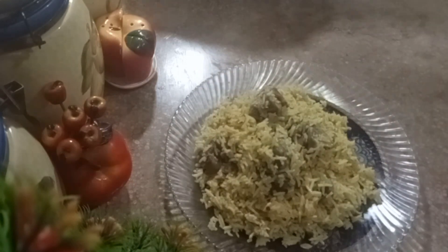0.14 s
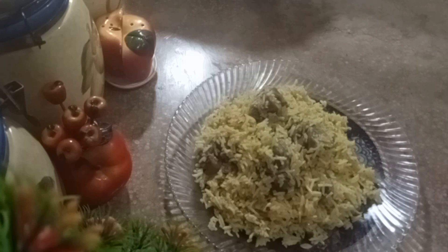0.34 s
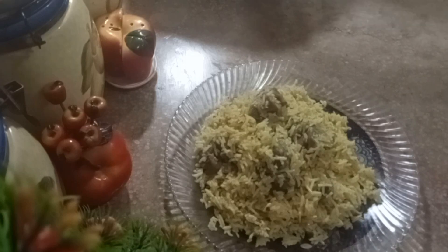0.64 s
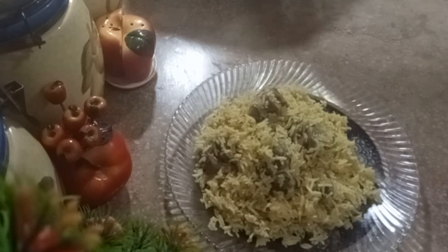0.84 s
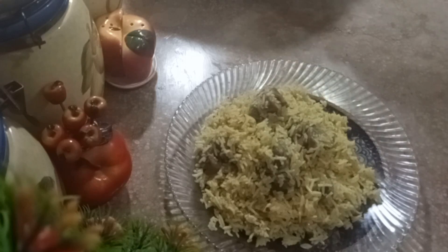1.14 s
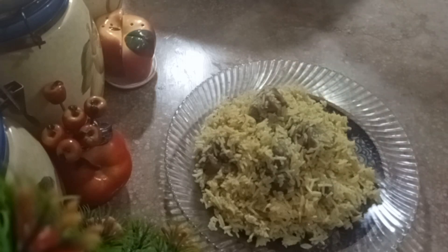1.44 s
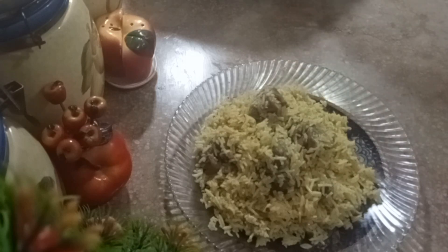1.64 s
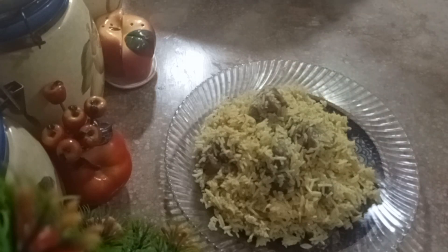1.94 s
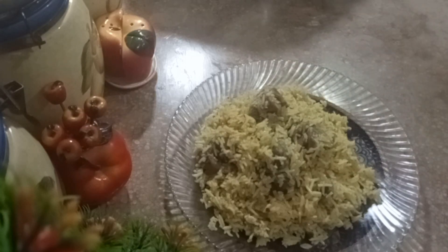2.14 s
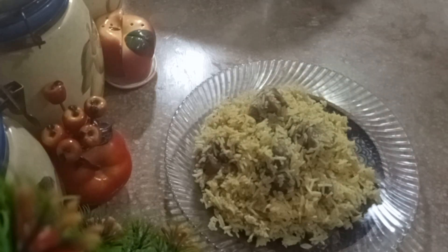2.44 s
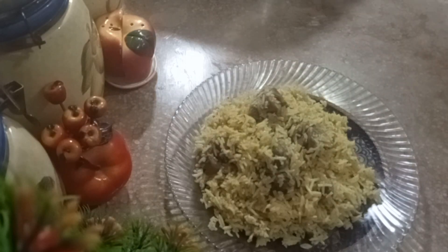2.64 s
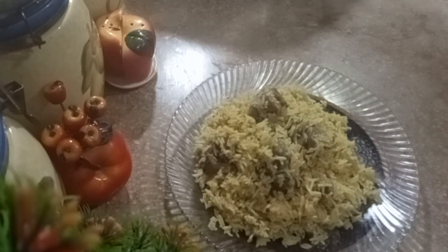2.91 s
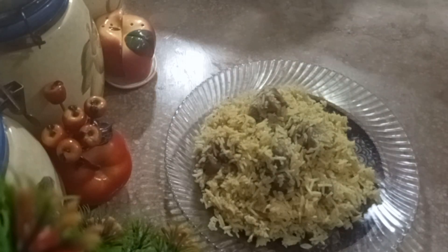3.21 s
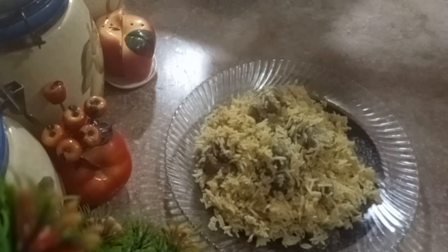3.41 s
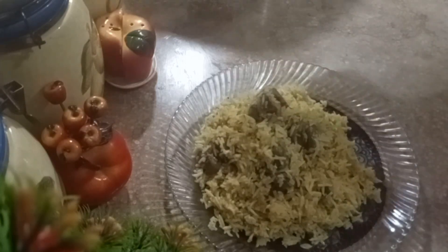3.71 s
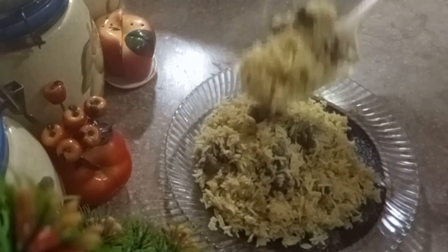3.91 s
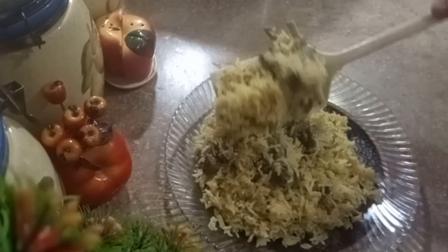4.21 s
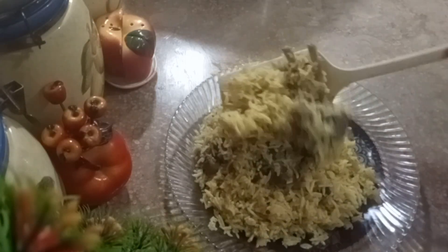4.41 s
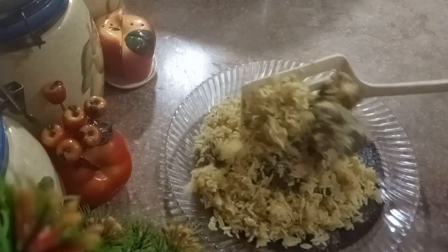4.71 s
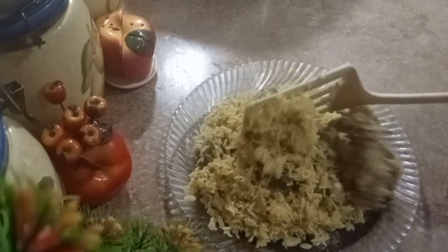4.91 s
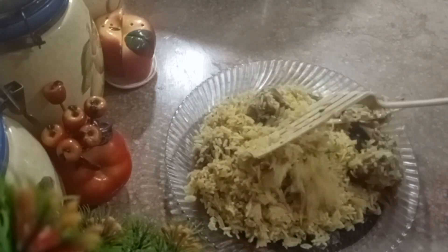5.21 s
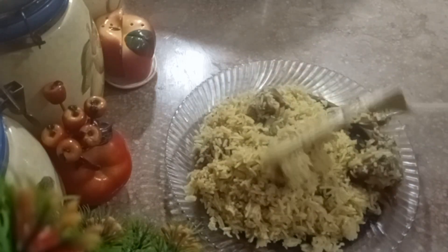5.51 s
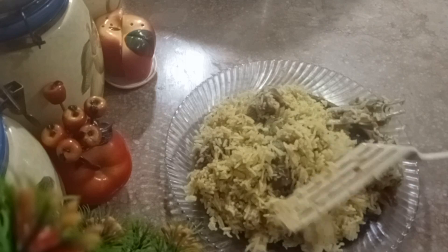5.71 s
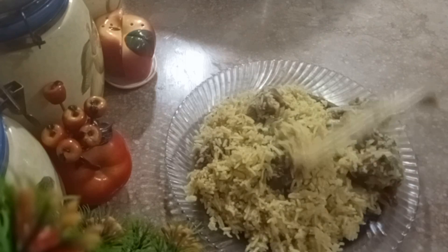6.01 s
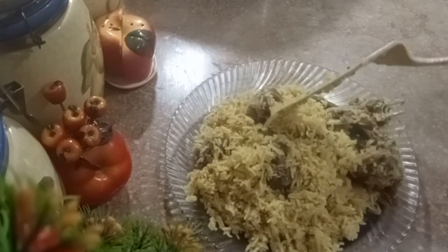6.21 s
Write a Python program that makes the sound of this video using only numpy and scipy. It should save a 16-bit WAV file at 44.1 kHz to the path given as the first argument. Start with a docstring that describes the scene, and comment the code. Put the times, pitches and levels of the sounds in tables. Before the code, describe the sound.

Metallic scraping and wet rice hiss in a pot, bird-like chirps, a knock, dull thuds, then soft rice flops and one glassy tap.

```python
"""In a small kitchen, a spatula digs through a metal pot of rice, clinks and knocks against it,
then drops the sticky rice on a glass plate and taps the plate once. Friction is random tiny slips through
filters and resonances; blows are noise cracks plus decaying sines; rice is noise hiss, clicks and flops.
Behind it, gliding tones chirp like a small bird, three dull knocks ring low modes, a sleeve swishes in
filtered noise, and an appliance hums in wandering sines over room noise."""
import sys
import numpy as np
from scipy import signal
from scipy.fft import rfft, irfft
from scipy.io import wavfile
from scipy.ndimage import uniform_filter1d

SR = 44100
rng = np.random.default_rng(int(sys.argv[2]) if len(sys.argv) > 2 else 0)


def generate_wav(sig):
    """Save sig (samples, or channels by samples) to the path in sys.argv[1] as 16-bit PCM at SR."""
    pcm = np.round(np.clip(np.atleast_2d(sig).T, -1, 1) * 32767).astype(np.int16)
    wavfile.write(sys.argv[1], SR, pcm)


N = 280035
TIME = np.arange(N) / SR   # s

# Levels are relative, ahead of each layer's own gain and the mix.
# room noise colour: [f/Hz, level/dB per Hz]
AIR_COLOUR = [(25, -14), (50, -6), (80, 1), (130, -1), (250, -1), (420, -3.5), (700, -11.5), (1400, -16.5),
              (2800, -20), (5600, -25), (8000, -27), (9300, -25.5), (11000, -31), (16000, -33)]
AIR_DB = -65.3
# appliance tones: [f/Hz, width/Hz, level/dB]
APPLIANCE_TONES = [(244.3, .4, -67.5), (9040, 90, -87)]
# reverberation of the kitchen: [f/Hz, t60/s]
KITCHEN_DECAY = [(100, 1), (500, .7), (2000, .54), (5000, .48), (9000, .38), (15000, .24)]

# dull knocks further off: [t/s, level/dB]
THUDS = [(2.712, -42), (2.961, -44), (3.147, -45.5)]
# landing and rebounds inside each dull knock: [delay t/s, level/dB]
THUD_REBOUNDS = [(0.003, -44), (0.014, -8.5), (0.026, -1.5), (0.077, -8), (0.115, -7.5)]
# ringing modes of a dull knock: [f/Hz, level/dB, t60/s]
THUD_MODES = [(74.3, -9.5, 0.69), (147, -19, 0.34), (186.4, -5, 0.58), (315, -13, 0.28), (409, -11, 0.23),
              (524, -10, 0.18), (547, -5.5, 0.49), (589, 0, 0.22), (617, -0.5, 0.23), (675, -10, 0.068),
              (782.7, -14, 0.26), (1730, -22, 0.083), (1893, -17, 0.15)]
# noise colour of a dull knock: [f/Hz, level/dB per Hz]
THUD_COLOUR = [(32, -40), (55, -19.5), (167, -5), (349, -26), (482, -15.5), (587, -10), (855, -27.5),
               (936, -22.5), (1600, -27.5), (1820, -25.5), (3700, -44), (5200, -89), (8800, -120)]
# bird-like chirps: [t/s, level/dB, top f/Hz, fall f/Hz, length t/s]
CHIRPS = [(1.152, -32, 2793, 324.1, 0.038), (1.268, -40, 2834, 24.8, 0.054),
          (1.508, -41.5, 2756, 410, 0.0366), (1.602, -42, 2800, 447, 0.036), (1.71, -42, 2745, 310, 0.027),
          (1.804, -42.5, 2798, 280, .04), (1.922, -47.5, 2800, 138.9, 0.033),
          (2.016, -61.5, 2790, 97.2, 0.04)]
CHIRP_ROUGHNESS = .2   # pitch quaver as a share of the fall

# sleeve swishes as the arm moves: [t/s, attack t/s, hold t/s, level/dB]
SWISHES = [(0, .02, .2, -71), (3.302, .2, 0.018, -62.5)]
# airy colour of the cloth: [f/Hz, level/dB per Hz]
SWISH_COLOUR = [(500, -13), (900, 1), (1350, 2), (2500, -5), (7200, -8.5), (9200, -0.5), (11500, -11),
                (16000, -12)]
SWISH_FADE_DB_PER_S = 134

# rice slides off the blade in one long pour
POUR_S, POUR_ATTACK_S, POUR_HOLD_S, POUR_FADE_DB_PER_S = 4.05, 0.29, .9, 62
SMALL_TICK_COUNT = 22
# moist clicks of parting grains: [t/s, level/dB, centre f/Hz, t60/s]
RICE_TICKS = [(4.162, -60, 2100, 0.044), (4.163, -64.5, 7540, 0.026), (4.303, -46, 7070, 0.019),
              (4.3291, -41, 5600, 0.026), (4.433, -59, 9000, 0.019), (4.46, -58, 9100, 0.02),
              (4.65, -73, 5000, .05), (4.699, -64, 5500, 0.023), (4.815, -68, 5560, 0.034),
              (4.831, -55.5, 10060, 0.018), (4.93, -57.5, 7500, .1), (5.008, -68, 1640, 0.2),
              (5.098, -63.5, 7070, 0.032), (5.687, -58.5, 7600, 0.049)]
# moist clumps flopping on the heap: [t/s, level/dB]
CLUMPS = [(4.165, -64), (4.33, -54), (4.44, -63), (4.92, -58.5), (5.08, -55.5), (5.3, -54.5), (5.385, -61)]
# dull colour of a flop: [f/Hz, level/dB per Hz]
CLUMP_COLOUR = [(50, -51.5), (110, 10.5), (400, -2.5), (700, -6.5), (1500, -11), (3000, -19), (8000, -44)]

# spatula on the glass plate: [t/s, level/dB]
PLATE_TAPS = [(5.157, -24)]
# ringing modes of the glass: [f/Hz, level/dB, t60/s]
PLATE_MODES = [(415, -21, .5), (910, -20, .4), (1421, -15, .42), (2043, -20, .58), (2283, -16, .25),
               (2772, 1, .39), (3112, -25, .5), (3601, -4, .43), (3610, -12, .45), (3640, -9, .14),
               (4545, -14, .46), (4560, -17, .42), (4600, -4, .12), (5576, -10, .44), (5596, -15, .42),
               (5612, -2, .15), (6745, -14, .22), (6770, -25, .42), (9308, -24, .3), (10730, -22, .22),
               (12240, -25, .19)]
# colour of the plate contact: [f/Hz, level/dB per Hz]
PLATE_CRACK = [(120, -22), (300, -21), (480, -12), (700, -23.5), (1100, -18), (1500, -6), (1900, -8),
               (2500, 2), (3050, -4), (3350, -7), (4200, -6), (5200, -9), (5750, 3), (6250, -30),
               (7000, -15), (8200, -24), (11000, -21), (16000, -40)]

# sharp clinks on the pot's rim: [t/s, level/dB]
CLINKS = [(0.248, -44.5), (1.018, -14)]
# ringing modes of the rim: [f/Hz, level/dB, t60/s]
RIM_MODES = [(2283, -17, .5), (3114, -7, .22), (3297, -5, .22), (3380, -5, .22), (3582, -3, .22),
             (3646, 0, .21), (3715, -3, .2), (3859, -8, .2), (3925, -8, .22), (4420, -19, .4),
             (5508, -14, .4), (5745, -9, .25), (6500, -15, .3), (6772, -11, .3), (6871, -10, .28),
             (7106, -15, .35), (8382, -22, .45)]
# colour of the rim contact: [f/Hz, level/dB per Hz]
RIM_CRACK = [(180, -51.5), (300, -27.5), (565, -13), (1300, -21), (1530, -15.5), (1690, -16.5),
             (2700, -16.5), (2930, -10.5), (3350, 3), (4670, -18), (5250, -7), (6960, -6.5), (7570, -10),
             (15000, -31), (16000, -52)]
# blows that set the whole pot ringing: [t/s, level/dB]
POT_KNOCKS = [(1.018, -31), (2.3345, -21.5)]
# ringing modes of the pot: [f/Hz, level/dB, t60/s]
POT_MODES = [(544, -7, .48), (676, -11, .25), (345, -6, .25), (860, -7, .22), (931, -5, .27),
             (1002, -7, .27), (1060, -5, .52), (1115, -7, .3), (1507, -10.5, .46), (1570, -12, .38),
             (1922, -13, .33), (2498, -19, .46), (3255, -19, .62), (3273, -12, .36), (4290, -12, .25),
             (4619, -15, .42), (4902, -16, .58), (4929, -9.5, .4), (5469, -19, .45), (5679, -12, .45),
             (6449, -13, .3), (6842, -20, .48), (7106, -15, .33), (7935, -11, .35), (8204, -13, .32),
             (9070, -9, .32), (9755, -15, .29)]
# colour of the blow on the pot: [f/Hz, level/dB per Hz]
POT_CRACK = [(50, -26), (90, -16), (145, 2), (230, -5), (360, -5.5), (550, -3), (750, -9), (1000, -1.5),
             (1600, -17), (2400, -20), (3300, -8), (3800, -20), (4600, -8.5), (9300, -7), (11500, -21.5),
             (16000, -26.5)]

# nudges that rub the pot while the scoop is gathered: [t/s, attack t/s, level/dB]
NUDGES = [(0.241, 0.055, -53), (1.5, 0.0031, -55), (1.669, 0.094, -57), (2.18, 0.051, -62)]
# dull colour of the rubbing: [f/Hz, level/dB per Hz]
RUB_COLOUR = [(50, -21), (90, -1), (160, 5.5), (280, -7.5), (420, 0), (600, -9), (800, -4), (1000, -10.5),
              (1300, -11.5), (1800, -20.5), (2600, -18.5), (6000, -24), (15000, -28.5)]
NUDGE_FADE_DB_PER_S = 99.5
# the blade judders over the pot's bottom in one spell
JUDDER_S, JUDDER_END_S, THROBS_PER_S = .456, 1.02, 24.4
JUDDER_ATTACK_S, JUDDER_HOLD_S, JUDDER_FADE_DB_PER_S = 0.076, 0.078, 33.5
# resonances the blade rasps on, bent by its pressure: [t/s, length t/s, from f/Hz, to f/Hz, level/dB]
RASPS = [(0.253, .07, 1700, 1696, -62.5), (0.411, .07, 1580, 1630, -57), (0.461, .075, 960, 758, -48.5),
         (0.596, .21, 1140, 1020, -38.5), (0.64, .08, 420, 439, -39), (0.686, .069, 2190, 2111, -37.5),
         (0.691, .08, 1520, 1430, -39.5), (0.846, .095, 1400, 1440, -40.5), (0.91, .09, 2780, 2880, -44)]
# jolts of the blade in the pot, then a faint low knock and two light touches: [t/s, level/dB, centre f/Hz]
JOLTS = [(0.507, -38, 427), (0.571, -34.5, 483), (0.654, -29.5, 1070), (0.682, -28, 2830),
         (0.702, -31, 1210), (0.711, -28.5, 2580), (0.737, -25.5, 2250), (0.800, -31, 565),
         (0.878, -30.5, 640), (1.503, -53, 1390), (2.18, -52.5, 3280), (2.186, -54, 5500)]

# how hard the blade is pushed through the pot, as gain: [t/s, level/dB]
EFFORT = [(0.389, -62.5), (0.434, -48), (0.572, -50), (0.649, -28.5), (0.659, -30.5), (0.668, -31.5),
          (0.744, -29), (0.77, -44.5), (1.01, -36)]
EASE_DB_PER_S = 78.5   # the push dies away once the blade is through
# resonances of the loaded pot under the blade: [f/Hz, width/Hz, level/dB]
SCRAPE_PEAKS = [(425, 45, -2), (1042, 25, -5), (1090, 40, -5), (1600, 30, -5), (2030, 60, -1),
                (2264, 40, -3), (2480, 100, -4), (2814, 30, 0), (2961, 30, -1), (3360, 38, -3),
                (3920, 28, -7), (4610, 70, -6), (5350, 39, -8), (6840, 72, -11), (7180, 45, -12)]
# colour of the metal scrape: [f/Hz, level/dB per Hz]
SCRAPE_COLOUR = [(350, -35), (600, -0.5), (817, -12.5), (1060, -7), (1200, -7), (1440, -5), (1890, -6.5),
                 (2120, -11.5), (2380, -1.5), (6000, -12), (7800, -42), (13200, -120)]
# colour of the wet rice hiss: [f/Hz, level/dB per Hz]
RICE_COLOUR = [(2060, -19), (3500, -14), (5060, -7), (7000, -7.5), (7560, -8.5), (9320, -5), (12200, -17),
               (14100, -15), (16000, -20)]
HISS_DB, HISS_FOLLOWS = -29.5, 0.53   # hiss gain at push 1; share of the effort's dB swing
HISS_ATTACK_S, HISS_HOLD_S, HISS_FADE_DB_PER_S = 0.099, 0.4, 26   # thins as the scoop comes loose
HISS_PATCHY_DB = 3.5   # colour changes as the rice turns over
SHEEN_DB, SHEEN_T60_S = -1.5, 0.063   # hiss rings briefly in the pot's dense high modes
# cuts of the blade into wet rice: [t/s, hiss level/dB]
CUTS = [(0.243, -49), (0.43, -56)]
CUT_ATTACK_S, CUT_FADE_DB_PER_S = 0.0059, 133
GRIT_PER_S, GRIT_SPREAD_DB = 100, 4.5   # loose grit snaps under the blade
# low bump as the pot shifts on its stand: [t/s, level/dB]
POT_SHIFTS = [(0.697, -39)]
# colour of the bump and the rumble after it: [f/Hz, level/dB per Hz]
RUMBLE_COLOUR = [(26, -45.5), (45, -16.5), (72, 1.5), (112, -8.5), (151, 1), (195, 1), (264, -13),
                 (350, -11.5), (460, -35.5), (770, -120)]
RUMBLE_DB = -14.5   # relative to the effort


def from_db(db):
    """Decibels to gain."""
    return 10 ** (np.asarray(db) / 20)


def rms_one(x):
    """Scale to rms 1."""
    return x / np.sqrt(np.mean(x ** 2) + 1e-20)


def at_hz(points, hz):
    """Read a table on a log-frequency axis."""
    f, value = np.transpose(points)
    return np.interp(np.log(np.maximum(hz, 1)), np.log(f), value)


def convolve(x, response):
    """Play x through an impulse response."""
    return signal.fftconvolve(x, response)[:N]


def colour(x, spectrum, size=8192):
    """Causal (minimum-phase) filter that keeps the power of white noise."""
    hz = np.arange(size // 2 + 1) * SR / size
    cepstrum = irfft(np.log(from_db(at_hz(spectrum, hz))))
    # fold the cepstrum forward in time to get minimum phase
    cepstrum[1:size // 2] *= 2
    cepstrum[size // 2 + 1:] = 0
    response = irfft(np.exp(rfft(cepstrum)))
    return convolve(x, response / np.linalg.norm(response))


def band(x, low_hz, high_hz):
    """Gentle band-pass."""
    edges = [low_hz, min(high_hz, .45 * SR)]
    return signal.sosfilt(signal.butter(2, edges, "band", fs=SR, output="sos"), x + 1e-18)


def resonate(x, hz, width_hz):
    """One resonance, gain about 1 on top."""
    r = np.exp(-np.pi * width_hz / SR)
    feed = np.array([1, 0, -1]) * (1 - r * r) / 2
    feedback = [1, -2 * r * np.cos(2 * np.pi * hz / SR), r * r]
    return signal.lfilter(feed, feedback, x + 1e-18)


def dying(t60):
    """One second of exponential decay."""
    return np.exp(-np.log(1000) * TIME[:SR] / t60)


def strike_envelope(contact_s, t60):
    """Contact build-up times exponential decay, peaking at 1."""
    envelope = np.minimum(TIME[:SR] / contact_s, 1) * dying(t60)
    return envelope / envelope.max()


def swell(start_s, attack_s, hold_s, fade_db_per_s):
    """Gain that rises smoothly, holds, then fades at a steady rate."""
    age = TIME - start_s
    rise = np.sin(np.pi / 2 * np.clip(age / attack_s, 0, 1)) ** 2
    return rise * from_db(-fade_db_per_s * np.maximum(age - attack_s - hold_s, 0))


def drift(per_s):
    """Random wander: straight lines between normal draws at the given rate."""
    knots = rng.standard_normal(int(per_s * N / SR) + 2)
    return np.interp(TIME * per_s, np.arange(len(knots)), knots)


def clicks(rows):
    """One impulse for each time and level."""
    out = np.zeros(N)
    for s, db in rows:
        out[max(0, round(s * SR))] += from_db(db)
    return out


def add(out, s, x):
    """Mix a short sound in at time s."""
    start = round(s * SR)
    out[start:start + len(x)] += x[:N - start]


def grains(per_s, spread_db):
    """Random tiny contacts of uneven size; rms 1."""
    sizes = from_db(spread_db * np.minimum(rng.exponential(1, N), 4))
    signed = sizes * rng.choice([-1, 1], N)
    return rms_one(signed * (rng.random(N) < per_s / SR))


def shifting(x, patchy_db, per_s):
    """Each band above 1 kHz swells and sinks by itself, so the grain keeps changing colour; rms 1."""
    edges = np.geomspace(1000, 16000, 10)
    out = 0
    for k, (low, high) in enumerate(zip(edges, edges[1:])):
        out = out + (-1) ** k * band(x, low, high) * from_db(patchy_db * drift(per_s))
    return rms_one(out)


def even_strength(x, window):
    """Steady pressure keeps friction's strength even: divide by its running rms over window samples."""
    return x / np.sqrt(uniform_filter1d(x ** 2, size=window) + 1e-12)


def ringing(modes):
    """Response of a struck body: a decaying sine for each mode."""
    out = np.zeros(SR)
    for hz, db, t60 in modes:
        out += from_db(db) * dying(t60) * np.sin(2 * np.pi * hz * TIME[:SR]) * rng.choice([-1, 1])
    return out


def struck(modes, free_db, damped_db, damped_share):
    """A blade-damped body: each mode sums a strong short decay and a fainter free one."""
    out = np.zeros(SR)
    for hz, db, t60 in modes:
        decay = from_db(free_db) * dying(t60) + from_db(damped_db) * dying(t60 * damped_share)
        out += from_db(db) * decay * np.sin(2 * np.pi * hz * TIME[:SR]) * rng.choice([-1, 1])
    return out


def crack(spectrum, contact_s, t60):
    """The dense vibration of a blow: coloured noise builds while the contact lasts, then dies."""
    return colour(rng.standard_normal(SR) * strike_envelope(contact_s, t60), spectrum)[:SR]


def kitchen(x, build_s):
    """Diffuse echoes that build up and die sooner in the treble; unit energy."""
    edges = np.geomspace(40, 18000, 13)
    tail = np.zeros(SR)
    for low, high in zip(edges, edges[1:]):
        decay = dying(at_hz(KITCHEN_DECAY, np.sqrt(low * high)))
        tail += band(rng.standard_normal(SR), low, high) * decay
    tail = tail * np.minimum(TIME[:SR] / build_s, 1)
    return convolve(x, tail / np.linalg.norm(tail))


def background():
    """Steady room noise, a hum and a faint whine, each tone wandering in pitch by random phase steps."""
    out = from_db(AIR_DB) * colour(rng.standard_normal(N), AIR_COLOUR)
    for hz, width_hz, db in APPLIANCE_TONES:
        wander = np.cumsum(rng.standard_normal(N)) * np.sqrt(2 * np.pi * width_hz / SR)
        tone = band(np.sin(2 * np.pi * hz * TIME + wander), hz / 1.1, hz * 1.1)
        out = out + from_db(db) * np.sqrt(2) * tone
    return out


def thuds(ring_db, noise_db, rebound_db):
    """Three dull knocks that rebound alike; each strikes the modes a little differently."""
    out = np.zeros(N)
    for thud in THUDS:
        modes = [(hz, db + rng.normal(0, 0.91), t60) for hz, db, t60 in THUD_MODES]
        contact = from_db(rebound_db) * crack(THUD_COLOUR, contact_s=0.0026, t60=0.066)
        body = convolve(clicks(THUD_REBOUNDS), ringing(modes) + contact)[:SR]
        noise = crack(THUD_COLOUR, contact_s=0.0006, t60=.38)
        out += convolve(clicks([thud]), from_db(ring_db) * body + from_db(noise_db) * noise)
    return out


def chirps(second_db, third_db, droop_power, fade_power):
    """Short whistles whose pitch drops ever faster; the further they drop, the hoarser they are."""
    out = np.zeros(N)
    quaver = CHIRP_ROUGHNESS * drift(600)
    for s, db, top_hz, fall_hz, length_s in CHIRPS:
        age = np.linspace(0, 1, int(length_s * SR))
        envelope = np.minimum(age / .2, 1) * (1 - age) ** fade_power
        roughness = quaver[round(s * SR):][:len(age)]
        hz = top_hz + fall_hz * (roughness - age ** droop_power)
        phase = 2 * np.pi * np.cumsum(hz) / SR
        overtones = from_db(second_db) * np.sin(2 * phase) + from_db(third_db) * np.sin(3 * phase)
        add(out, s, from_db(db) * envelope * (np.sin(phase) + overtones))
    return out


def swishes():
    """Smooth, airy brushing of cloth: coloured noise under slow swells."""
    motion = sum(from_db(db) * swell(s, attack_s, hold_s, SWISH_FADE_DB_PER_S)
                 for s, attack_s, hold_s, db in SWISHES)
    return motion * colour(rng.standard_normal(N), SWISH_COLOUR)


def tick(centre_hz, t60):
    """One moist click, some one and a half octaves wide; the longer it lasts, the softer it starts."""
    noise = rms_one(band(rng.standard_normal(SR), centre_hz / 1.76, centre_hz * 1.68))
    return noise * strike_envelope(0.061 * t60, t60)


def falling_rice(slide_db, patchy_db, small_ticks_db, clump_db):
    """Moist clicks as grains part, each of its own size and pitch, a soft rustle, and flops on the heap."""
    pour = swell(POUR_S, POUR_ATTACK_S, POUR_HOLD_S, POUR_FADE_DB_PER_S)
    rustle = shifting(grains(per_s=3600, spread_db=10.0), patchy_db, per_s=27)
    out = from_db(slide_db) * pour * rustle
    for when, size, pitch, length in rng.random((SMALL_TICK_COUNT, 4)):
        s = POUR_S + when * (POUR_ATTACK_S + POUR_HOLD_S)
        small_tick = tick(3000 * 4 ** pitch, .01 + .04 * length)
        add(out, s, from_db(small_ticks_db - 10 * size) * small_tick)
    for s, db, hz, t60 in RICE_TICKS:
        add(out, s, from_db(db) * tick(hz, t60))
    flops = convolve(clicks(CLUMPS), crack(CLUMP_COLOUR, contact_s=0.00482, t60=0.44))
    return out + from_db(clump_db) * flops


def plate_tap(ring_db, wash_db, wash_t60):
    """A short crack, then the glass sings on over a wash of close echoes."""
    wash = from_db(wash_db) * crack(PLATE_CRACK, contact_s=0.0069, t60=wash_t60)
    contact = crack(PLATE_CRACK, contact_s=0.0023, t60=0.025)
    glass = from_db(ring_db) * ringing(PLATE_MODES)
    return convolve(clicks(PLATE_TAPS), contact + glass + wash)


def rim_clinks():
    """Bright clinks: a crack of contact and the damped modes of the rim."""
    contact = crack(RIM_CRACK, contact_s=0.0024, t60=0.04)
    rim = struck(RIM_MODES, free_db=-22.5, damped_db=-18.5, damped_share=0.18)
    return convolve(clicks(CLINKS), contact + rim)


def pot_knocks(ring_db, shimmer_db, shimmer_t60, wash_db, wash_t60):
    """Fuller knocks on the wall: a crack, then clear modes over a shimmer of weak ones and close echoes."""
    weak_hz = rng.uniform(2800, 11500, size=60)
    weak_modes = [(hz, at_hz(POT_CRACK, hz), shimmer_t60) for hz in weak_hz]
    wall = from_db(ring_db) * ringing(POT_MODES) + from_db(shimmer_db) * ringing(weak_modes)
    wash = from_db(wash_db) * crack(POT_CRACK, contact_s=0.0022, t60=wash_t60)
    contact = crack(POT_CRACK, contact_s=0.001, t60=0.059)
    return convolve(clicks(POT_KNOCKS), contact + wall + wash)


def rubbing(level_db):
    """Light, dull friction at each nudge of the pot."""
    pressure = sum(from_db(db) * swell(s, attack_s, 0, NUDGE_FADE_DB_PER_S) for s, attack_s, db in NUDGES)
    return from_db(level_db) * pressure * colour(grains(per_s=4500, spread_db=-2.5), RUB_COLOUR)


def judder(level_db, low_hz, high_hz, width_hz, throb_db, uneven_db):
    """Slower stick and slip rocks two low resonances of the pot, in uneven throbs."""
    slips = grains(per_s=570, spread_db=1.0)
    groan = band(resonate(slips, low_hz, width_hz) - resonate(slips, high_hz, width_hz), 380, 1300)
    groan = even_strength(groan, window=2000)
    beat = np.cos(2 * np.pi * THROBS_PER_S * (TIME - JUDDER_S))
    throbs = from_db(throb_db * beat + uneven_db * drift(70))
    spell = swell(JUDDER_S, JUDDER_ATTACK_S, JUDDER_HOLD_S, JUDDER_FADE_DB_PER_S) * (TIME < JUDDER_END_S)
    return from_db(level_db) * spell * rms_one(groan * throbs)


def rasps(width_hz, rough_db):
    """Friction drives a gliding resonance that swells and fades with each stretch of the stroke."""
    out = np.zeros(N)
    r = np.exp(-np.pi * width_hz / SR)
    for s, length_s, from_hz, to_hz, db in RASPS:
        friction = rng.standard_normal(SR)[:int(length_s * SR)]
        age = np.linspace(0, 1, len(friction))
        glide_hz = from_hz + (to_hz - from_hz) * age
        # shift the gliding pitch down to zero, smooth there, and shift back
        turn = np.exp(2j * np.pi * np.cumsum(glide_hz) / SR)
        ring = (signal.lfilter([1], [1, -r], friction / turn) * turn).real
        add(out, s, from_db(db) * np.sin(np.pi * age) * even_strength(ring, window=1500))
    return out * from_db(rough_db * drift(130))


def jolts(contact_s, t60, spread, broad_db):
    """Jolts, a faint low knock and light touches: short rough noise, strongest around one pitch."""
    out = np.zeros(N)
    envelope = strike_envelope(contact_s, t60)
    ratio = 1 + spread
    for s, db, hz in JOLTS:
        noise = rng.standard_normal(SR)
        pitched = rms_one(band(noise, hz / ratio, hz * ratio))
        broad = from_db(broad_db) * rms_one(band(noise, 730, 5000))
        add(out, s, from_db(db) * (pitched + broad) * envelope)
    return out


def effort():
    """Gain of the push: sets in, follows its curve, then eases off."""
    s, db = np.transpose(EFFORT)
    return from_db(np.interp(TIME, s, db)) * swell(s[0], 0.028, s[-1] - s[0], EASE_DB_PER_S)


def wet_hiss(push, grip):
    """Wet rice grains hiss with the push and at each cut, in ever-changing colour."""
    hiss_spell = swell(EFFORT[0][0], HISS_ATTACK_S, HISS_HOLD_S, HISS_FADE_DB_PER_S)
    gain = from_db(HISS_DB) * push ** HISS_FOLLOWS * hiss_spell
    gain = gain + sum(from_db(db) * swell(s, CUT_ATTACK_S, 0, CUT_FADE_DB_PER_S) for s, db in CUTS)
    turning = shifting(grains(per_s=1600, spread_db=2.5), HISS_PATCHY_DB, per_s=36)
    return gain * grip * colour(turning, RICE_COLOUR)


def pot_sheen(rice):
    """The pot's dense high modes answer the hiss like a short burst of decaying noise."""
    modes = rms_one(rng.standard_normal(SR) * dying(SHEEN_T60_S)) / np.sqrt(SR)   # unit energy
    return from_db(SHEEN_DB) * convolve(rice, modes)


def digging(scrape_db, peaks_db, ring_db, flutter_db, wander_db, grit_db):
    """Countless slips of the blade excite the pot; scrape, wet hiss and rumble all follow the push."""
    push = effort()
    grip = from_db(flutter_db * drift(110))   # the blade grips and lets go
    slips = grains(per_s=3000, spread_db=3.0) * grip
    # as the blade travels it favours now one resonance, now another
    body = rms_one(sum(from_db(db + wander_db * drift(30)) * resonate(slips, hz, width)
                       for hz, width, db in SCRAPE_PEAKS))
    metal = (from_db(scrape_db) * colour(slips, SCRAPE_COLOUR) + from_db(peaks_db) * body) * push
    wall = ringing(POT_MODES)
    after_ring = from_db(ring_db) * convolve(slips * push, wall / np.linalg.norm(wall))
    rice = wet_hiss(push, grip)
    snaps = colour(grains(GRIT_PER_S, GRIT_SPREAD_DB), SCRAPE_COLOUR)
    grit = from_db(grit_db) * push * shifting(snaps, patchy_db=5.5, per_s=90)
    rice = rice + pot_sheen(rice)
    bump = convolve(clicks(POT_SHIFTS), crack(RUMBLE_COLOUR, contact_s=0.024, t60=0.35))
    has_shifted = TIME > POT_SHIFTS[0][0]
    rumble = from_db(RUMBLE_DB) * push * has_shifted * colour(slips, RUMBLE_COLOUR)
    return metal + grit + after_ring + rice + bump + rumble


def scene():
    """Chirps get the most kitchen echo for their level, plate and pot knocks the least; thuds get none."""
    pot = digging(scrape_db=-7.5, peaks_db=-8.5, ring_db=-25, flutter_db=1.0, wander_db=8.0, grit_db=-12.5)
    pot += rubbing(level_db=1.0)
    pot += jolts(contact_s=0.0014, t60=0.058, spread=0.22, broad_db=-7.5)
    pot += rasps(width_hz=120, rough_db=2.0)
    pot += judder(level_db=-40.5, low_hz=413.2, high_hz=576, width_hz=40, throb_db=3.0, uneven_db=3.5)
    pot += rim_clinks()
    knocks = pot_knocks(ring_db=-14.5, shimmer_db=-23, shimmer_t60=.38, wash_db=-17.5, wash_t60=0.47)
    tap = plate_tap(ring_db=-10, wash_db=-22.0, wash_t60=0.47)
    rice = falling_rice(slide_db=-78.5, patchy_db=3, small_ticks_db=-70, clump_db=-3.0)
    whistles = chirps(second_db=-14, third_db=-21.5, droop_power=2.6, fade_power=0.67)

    echo_send = from_db(-5.5) * pot + from_db(-12.5) * (tap + knocks)
    echo_send += from_db(-9) * rice + from_db(-3.5) * whistles
    echoes = kitchen(echo_send, build_s=0.0076)
    direct = pot + knocks + tap + rice + from_db(-3) * whistles
    direct += thuds(ring_db=-1.5, noise_db=-2.5, rebound_db=-7) + swishes()
    mono = direct + echoes + background()
    return np.array([mono, mono])


def record(dry):
    """One small microphone on both channels: no deep bass, and the top is cut."""
    thin = signal.sosfilt(signal.butter(3, 52, "high", fs=SR, output="sos"), dry)
    return signal.sosfilt(signal.ellip(10, .1, 80, 15850, fs=SR, output="sos"), thin)


dry = scene()
out = record(dry)
generate_wav(out)
```